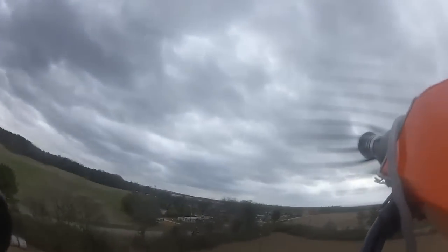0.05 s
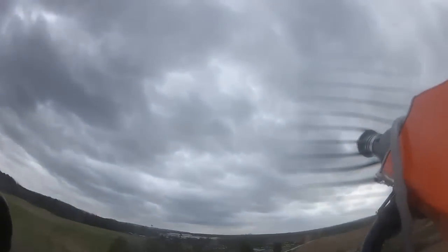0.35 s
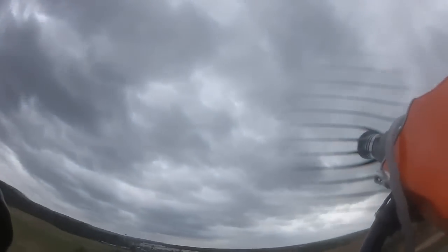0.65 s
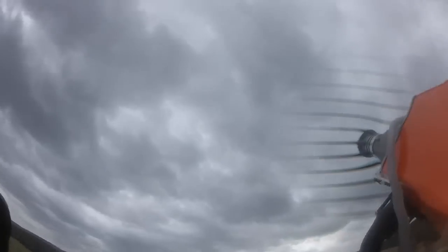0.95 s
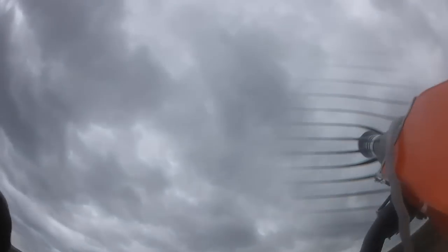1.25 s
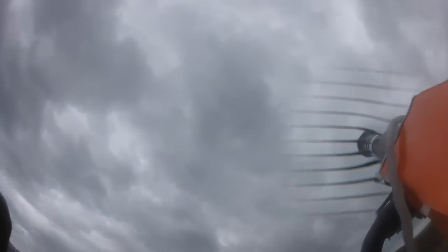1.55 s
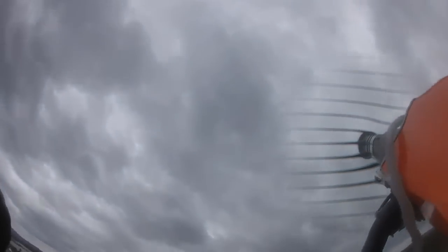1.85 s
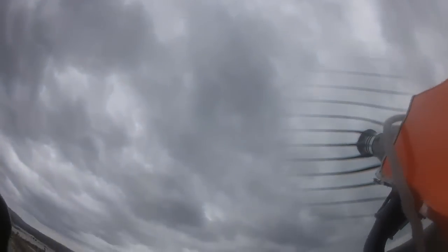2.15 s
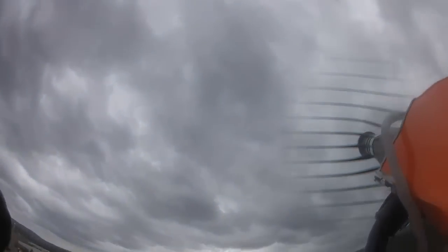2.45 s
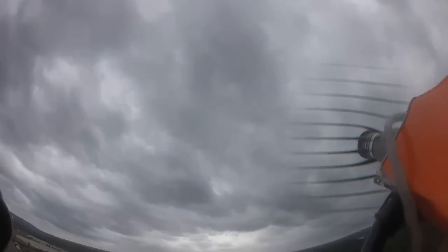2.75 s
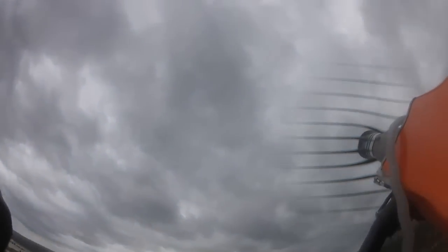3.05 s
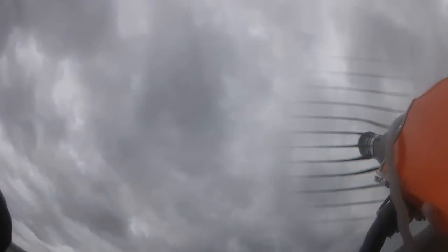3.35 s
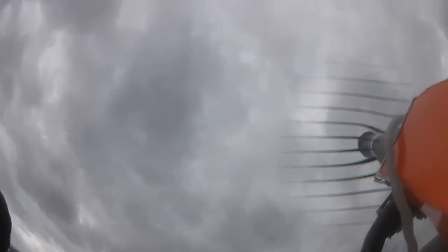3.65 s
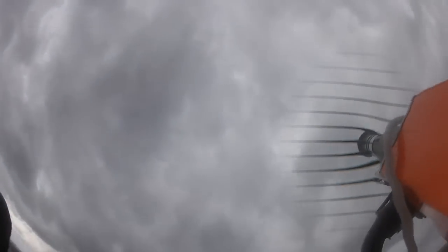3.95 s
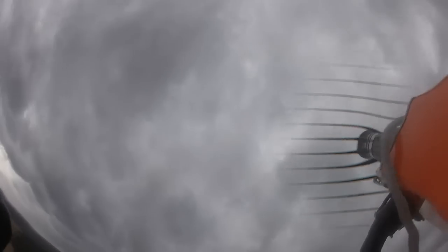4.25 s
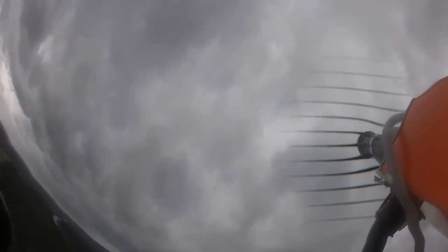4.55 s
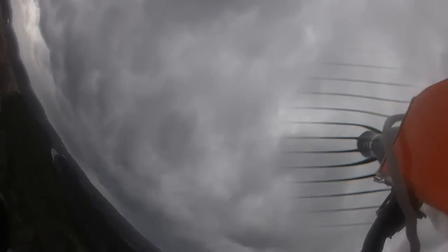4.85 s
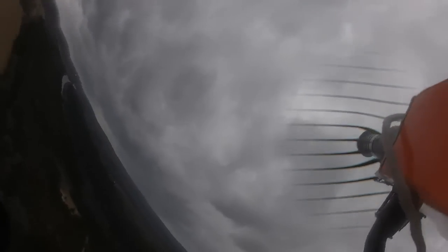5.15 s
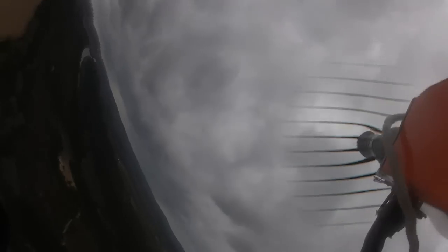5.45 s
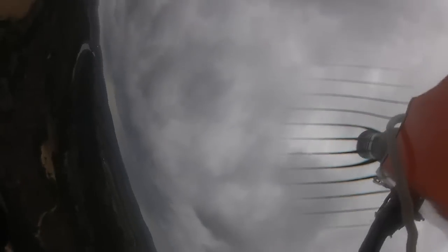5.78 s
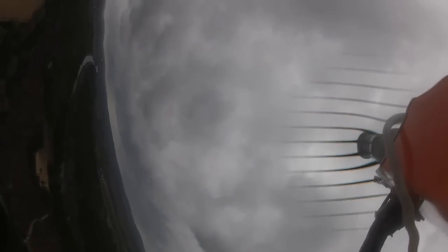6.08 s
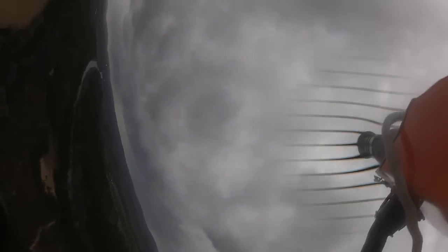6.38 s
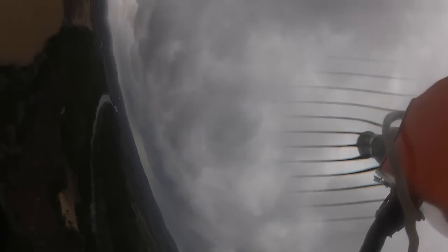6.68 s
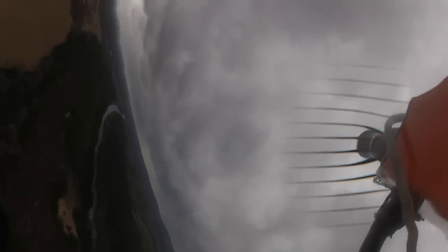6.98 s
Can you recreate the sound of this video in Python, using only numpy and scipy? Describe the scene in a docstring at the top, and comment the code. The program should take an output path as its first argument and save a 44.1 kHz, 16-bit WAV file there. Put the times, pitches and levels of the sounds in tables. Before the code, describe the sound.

A small two-stroke model plane engine and its propeller hold a steady, high whine in open air, heard from a microphone mounted on the plane. Wind roars throughout, with soft low thumps. Gusts tear into bright, crackling hiss that overloads the microphone and briefly ducks the engine, strongest at the start and again near the end. The whine grows a little brighter midway and gains a lower buzz at the finish.

```python
"""On board a model plane

Open air, a camera microphone riding on the plane, close to a two-stroke glow engine that turns a
two-blade propeller flat out. The slipstream roars; now and then it thumps on the microphone port or
tears into a bright, crackling hiss. Wind and engine overload the microphone together, so every blast
of hiss ducks the engine note."""
import sys
import numpy as np
from scipy.fft import rfft, irfft, next_fast_len
from scipy.io import wavfile
from scipy.ndimage import uniform_filter1d, map_coordinates

SR = 44100
rng = np.random.default_rng(int(sys.argv[2]) if len(sys.argv) > 2 else 0)


def waveform_to_disk(signal):
    """Save audio, clipped to [-1, 1], as 16-bit WAV at the path in sys.argv[1]."""
    frames = np.transpose(np.atleast_2d(signal))
    scaled = np.clip(frames, -1, 1) * 32767
    samples = np.round(scaled).astype(np.int16)
    wavfile.write(sys.argv[1], SR, samples)


N = 309582


def amp(db):
    """Decibels to gain."""
    return 10 ** (np.asarray(db) / 20)


def unit(x):
    """Scale to rms 1."""
    return x / np.sqrt(np.mean(x ** 2) + 1e-20)


def gain_at(points, hz):
    """Gain of (frequency [Hz], level [dB]) points joined on a log axis."""
    f, db = np.transpose(points)
    return amp(np.interp(np.log(hz + 1), np.log(f + 1), db))


def curve(points):
    """Join (time [s], value) points into one value per sample."""
    times, values = np.transpose(points)
    return np.interp(np.arange(N) / SR, times, values)


def wobble(rate):
    """A smooth random curve, rate knots a second."""
    knots = rng.standard_normal(int(N * rate / SR) + 4)
    return map_coordinates(knots, [np.arange(N) * rate / SR])


def swells(events, squareness):
    """Level in dB of (time, rise, width) events that each rise, hold and fall."""
    t = np.arange(N) / SR
    return sum(rise_db * .5 ** np.minimum(np.abs(2 * (t - centre) / width) ** squareness, 20)
               for centre, rise_db, width in events)


def filtered(x, response):
    """Filter x by a gain given as a function of frequency."""
    size = next_fast_len(N + SR // 2)
    hz = np.fft.rfftfreq(size, 1 / SR)
    return irfft(rfft(x, size) * response(hz), size)[..., :N]


def noise(spectrum):
    """Coloured noise of rms 1."""
    return unit(filtered(rng.standard_normal(N), lambda hz: gain_at(spectrum, hz)))


def harmonics(angle, orders, flutter_db):
    """Sines locked to the shaft, each fluttering a little in the turbulent air."""
    return sum(np.sqrt(2) * amp(db + flutter_db * wobble(11)) * np.sin(order * angle)
               for order, db in orders)


def shaft_angle(tremble=0.00197, hunting=0.0008):
    """The shaft slows a little under load; uneven firing makes its speed tremble and hunt."""
    # engine speed: (time [s], turns per second [Hz])
    speed = [(0.0, 285.3), (0.36, 285.8), (1.62, 282.7), (1.8, 281.1), (2.88, 280.7), (3.6, 278.0),
             (3.78, 279.6), (4.32, 278.4), (5.4, 279.4), (5.58, 280.4), (6.3, 279.1), (7.02, 280.0)]
    shaft_hz = curve(speed) * (1 + tremble * wobble(60) + hunting * wobble(6))
    return 2 * np.pi * np.cumsum(shaft_hz) / SR


def propeller(angle, gust_db, bank_start_s=2.06, bank_length_s=2.18):
    """Two blade passes a turn; gusts load the blades, and banking lifts the tone and its 2nd harmonic."""
    # third harmonic of the blade tone: (time [s], level [dB])
    third_level = [(0, -32), (2.7, -35.5), (3.1, -28), (4.0, -26.5), (4.95, -36), (5.5, -29.5),
                   (6.05, -24.5), (6.45, -35), (6.75, -25), (7.02, -38)]
    # faint high engine buzz: (multiple of the shaft speed, level re the second blade harmonic [dB])
    buzz_orders = [(8, -24), (10, -46), (17, -17)]
    bank = np.clip((np.arange(N) / SR - bank_start_s) / bank_length_s, 0, 1)
    blade_db = -20 + 1.45 * bank + 0.2 * wobble(4) + 0.25 * gust_db
    second_db = -33.5 + 11 * bank
    blade_tone = harmonics(angle, [(2, blade_db)], flutter_db=0.48)
    overtones = harmonics(angle, [(4, second_db), (6, curve(third_level))], flutter_db=1.53)
    buzz = amp(second_db) * harmonics(angle, buzz_orders, flutter_db=1.53)
    return blade_tone + overtones + buzz


def exhaust(angle):
    """The two-stroke fires once a turn, sounding an octave below the blade tone."""
    # exhaust note at the port: (time [s], level [dB])
    level = [(0, -32), (2.5, -41), (6.2, -39), (6.55, -26.5), (6.78, -32), (6.9, -22.5), (7.02, -24.5)]
    # its odd harmonics: (multiple of the shaft speed, relative level [dB])
    orders = [(1, 0.5), (3, -4.5), (5, -13), (7, -11)]
    return amp(curve(level)) * harmonics(angle, orders, flutter_db=0.48)


def buffeting(gust_db, eddies):
    """Wind roars on the microphone port, fed by gusts and thumping when a large eddy hits."""
    # large eddies: (time [s], rise [dB], width at half height [s])
    thumps = [(0.04, 1.5, 0.14), (0.75, 1, 0.24), (2.36, 2, 0.12), (4.87, 3, 0.2), (5.18, 2, 0.12),
              (5.6, 2, 0.092), (6.97, 2, 0.094)]
    # low wind roar: (frequency [Hz], relative density [dB])
    spectrum = [(20, -12), (40, -13), (70, -2.5), (130, -2), (230, 1.5), (450, 1), (800, 0), (1300, -5),
                (2200, -25.5), (4000, -46), (9000, -62)]
    level_db = -19 + 0.5 * wobble(6) + swells(thumps, squareness=2.5) + 0.2 * gust_db
    flutter_db = 1.14 * wobble(110) - 0.5 * eddies
    return amp(level_db + flutter_db) * noise(spectrum)


def slipstream(gust_db, eddies, stall_db=-21, rush_gain_db=3.5, torn_gain_db=9):
    """Air rushes past the housing and crackles into bright hiss where it tears off the edges."""
    # strength of the flow between gusts: (time [s], level [dB])
    airflow = [(0, -26.5), (0.8, -25.5), (1.3, -26.5), (2.4, -25), (3.4, -26.7), (4.35, -29.5), (5.4, -28),
               (6.3, -29.5), (6.6, -27.5), (6.9, -30)]
    # sliding air: (frequency [Hz], relative density [dB])
    rush_spectrum = [(200, -11), (700, -3), (1300, -0.5), (2000, -1.5), (3000, -12), (5000, -19.5),
                     (9000, -30), (15000, -35)]
    # tearing air: (frequency [Hz], relative density [dB])
    torn_spectrum = [(400, -25), (1200, -2.5), (2000, 2.5), (2800, 2), (3800, 0), (5200, -5), (8000, -9.5),
                     (15000, -24)]
    excess_db = curve(airflow) + 0.71 * wobble(16) + gust_db - stall_db
    flurries_db = 1.8 * eddies + 2.5 * wobble(200)
    crackle_db = 5 * wobble(800)
    # torn air grows much faster than the rush, so strong blasts are the brightest
    rush_db = stall_db + 0.84 * excess_db + rush_gain_db + flurries_db
    torn_db = stall_db + 2.55 * excess_db + torn_gain_db + flurries_db + crackle_db
    return amp(rush_db) * noise(rush_spectrum) + amp(torn_db) * noise(torn_spectrum)


def overload(x, drive_db=10, ceiling_db=-13, hardness=4):
    """The microphone saturates and squares off the wave."""
    driven = amp(drive_db) * x
    return driven / (1 + np.abs(driven / amp(ceiling_db)) ** hardness) ** (1 / hardness)


def housing(hz, corner_hz=238, shelf=2.13):
    """The housing's broad bass hump, over a low roll-off, rounds the wave's flat tops."""
    # microphone colour: (frequency [Hz], gain [dB])
    colour = [(20, 1), (200, 0), (1500, -0.5), (3000, -3), (5000, -4.5), (8000, -7.5), (15000, -19.5)]
    s = 1j * hz / corner_hz
    roll_off = s / (1 + s)
    bass_lift = 1 + shelf / (1 + s)
    return roll_off * bass_lift * gain_at(colour, hz)


def fizz(x, level_db=-25.5, follow=0.71):
    """A fine sizzle swells with the sharp edges of the overloaded wave."""
    # sizzle: (frequency [Hz], relative density [dB])
    spectrum = [(2500, -13), (5000, -69), (6800, 2.5), (9000, 6), (11000, 4), (13000, 3), (15300, 5)]
    edges = filtered(x, lambda hz: hz > 2200)
    edge_rms = np.sqrt(np.abs(uniform_filter1d(edges ** 2, size=260)))
    return amp(level_db) * unit(edge_rms ** follow * noise(spectrum))


def mirror_whistle(x, carrier_hz=12000):
    """The camera mirrors the sound faintly around a high carrier: a thin whistle rides on the engine."""
    # what gets mirrored: (frequency before mirroring [Hz], gain [dB])
    leak = [(100, -42), (560, -18.5), (1120, -14), (1700, -13.5), (2500, -23), (3500, -36)]
    carrier = np.cos(2 * np.pi * carrier_hz * np.arange(N) / SR)
    return filtered(x, lambda hz: gain_at(leak, hz)) * carrier


def passband(hz, top_hz=15320):
    """The camera's response has steep, narrow dips and a hard upper limit."""
    # treble dips: (centre [Hz], half-width [Hz])
    dips = [(6000, 322), (12000, 330)]
    notches = [1 - np.exp(-((hz - centre) / width) ** 4) for centre, width in dips]
    return np.prod(notches, axis=0) * (hz < top_hz)


def scene():
    """Engine and wind meet at a single microphone port on the plane."""
    # gusts that tear the flow off the housing: (time [s], rise in flow [dB], width at half height [s])
    gusts = [(0.025, 8.5, 0.051), (0.115, 8, 0.014), (0.36, 9.5, 0.34), (0.61, 1.5, 0.084),
             (0.707, 10, 0.023), (0.95, 4.5, 0.033), (1.042, 8, 0.046), (1.14, 5.5, 0.024),
             (1.41, 4, 0.031), (1.706, 6.5, 0.055), (1.991, 4.5, 0.015), (2.22, 5.5, 0.15),
             (2.486, 3.5, 0.034), (2.561, 5, 0.018), (2.619, 5, 0.028), (2.972, 6.5, 0.042),
             (4.1, 4.5, 0.063), (4.53, 7, 0.03), (4.82, 5, 0.036), (5.016, 4.5, 0.022), (5.632, 3, 0.027),
             (5.95, 2, 0.35), (6.73, 9.5, 0.2)]
    gust_db = swells(gusts, squareness=3.6)
    angle = shaft_angle()
    engine = propeller(angle, gust_db) + exhaust(angle)
    eddies = wobble(55)
    wind = buffeting(gust_db, eddies) + slipstream(gust_db, eddies)
    pressure = engine + wind
    return np.array([pressure, pressure])


def record(dry):
    """One overloaded microphone, coloured by the camera, feeds both channels."""
    squared = overload(dry[0])
    coloured = filtered(squared, housing) + fizz(squared) + mirror_whistle(squared)
    mono = filtered(coloured, passband)
    return np.array([mono, mono])


dry = scene()
out = record(dry)
waveform_to_disk(out)
```